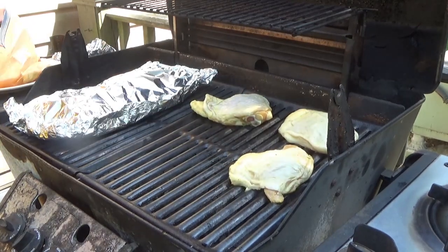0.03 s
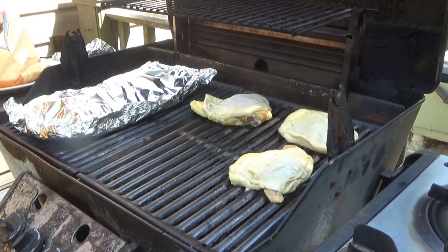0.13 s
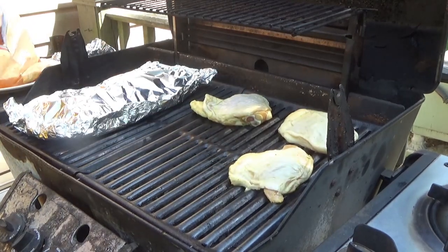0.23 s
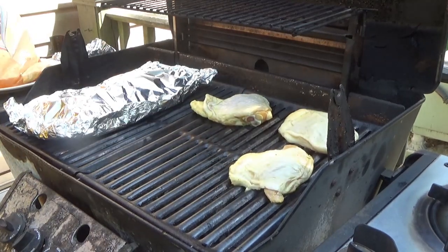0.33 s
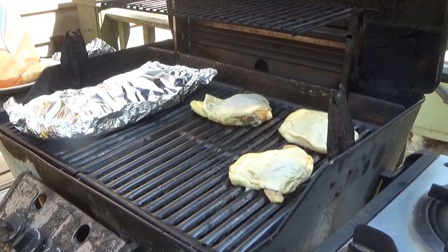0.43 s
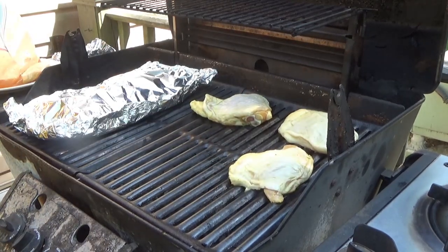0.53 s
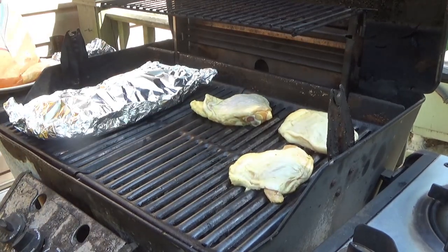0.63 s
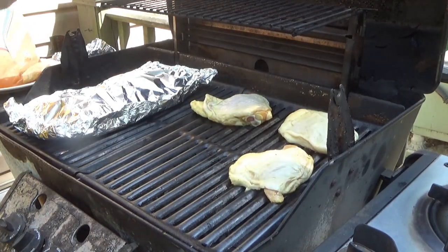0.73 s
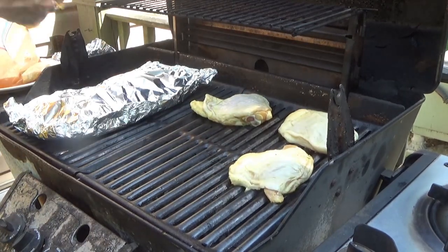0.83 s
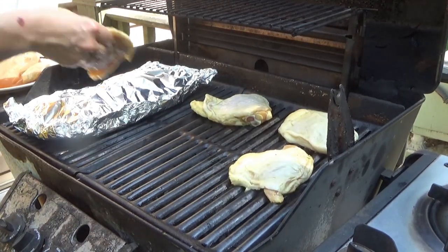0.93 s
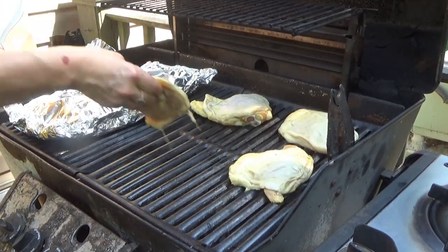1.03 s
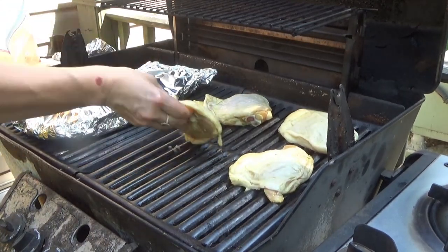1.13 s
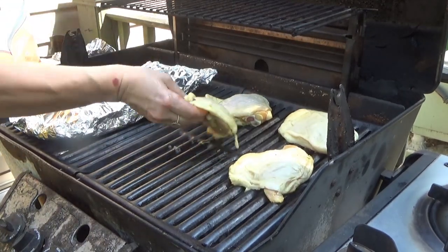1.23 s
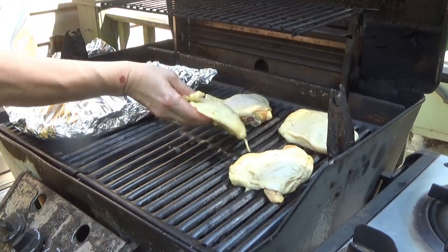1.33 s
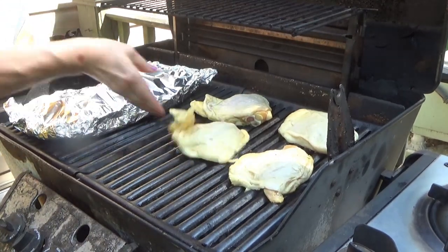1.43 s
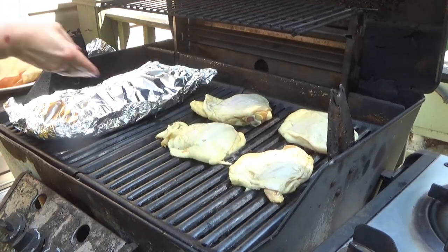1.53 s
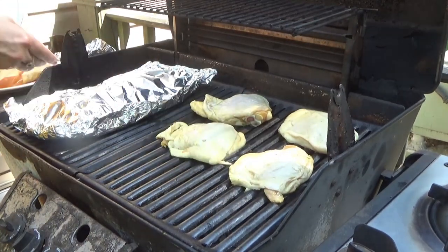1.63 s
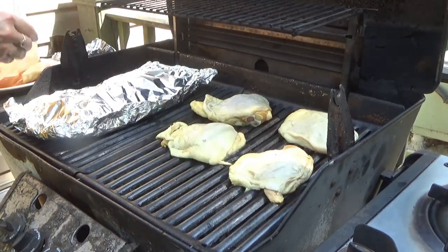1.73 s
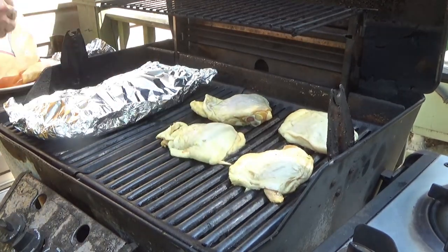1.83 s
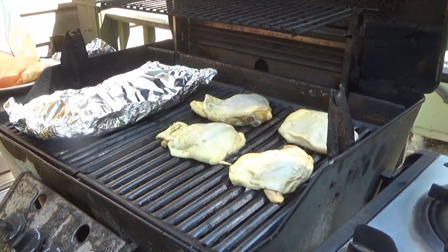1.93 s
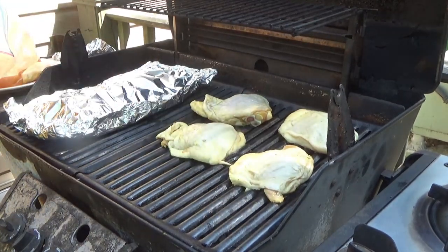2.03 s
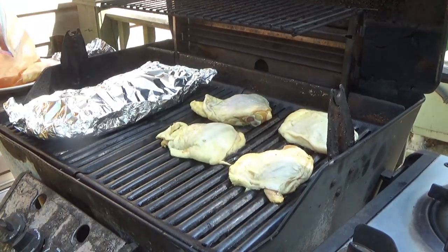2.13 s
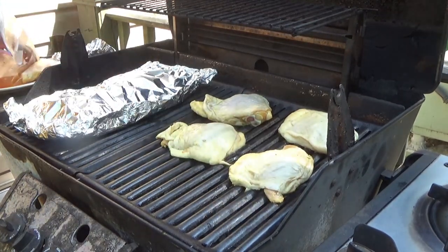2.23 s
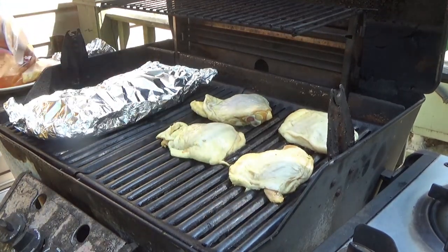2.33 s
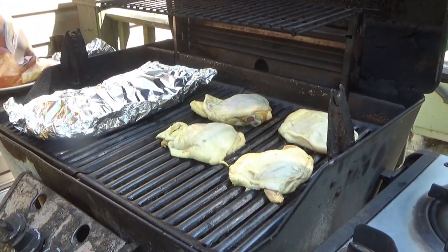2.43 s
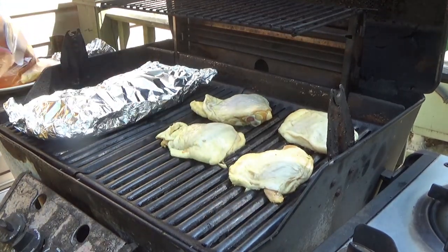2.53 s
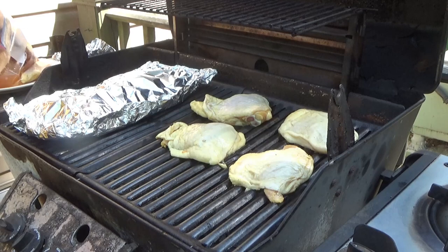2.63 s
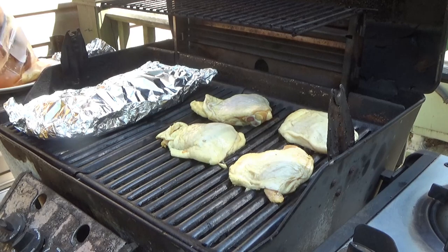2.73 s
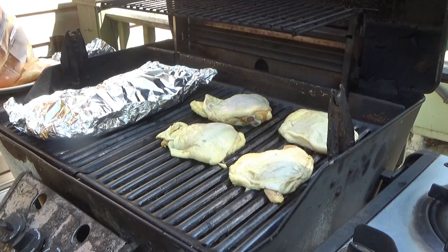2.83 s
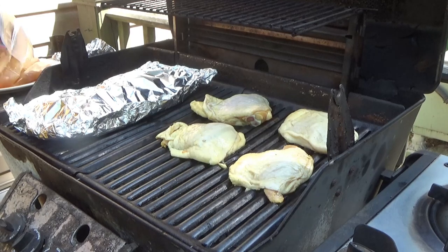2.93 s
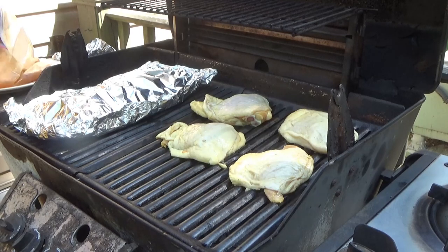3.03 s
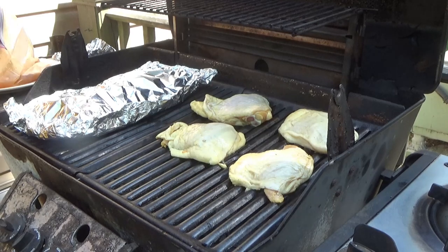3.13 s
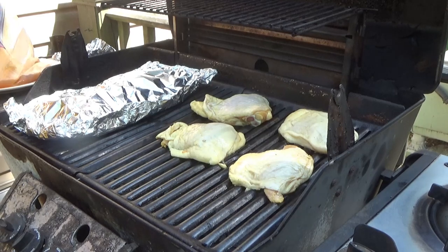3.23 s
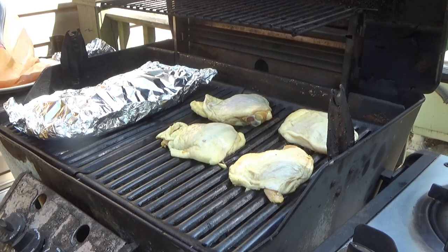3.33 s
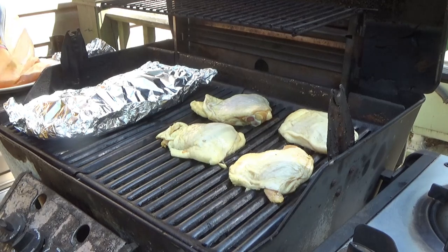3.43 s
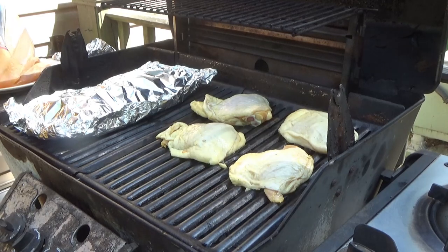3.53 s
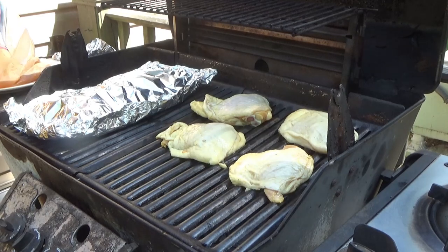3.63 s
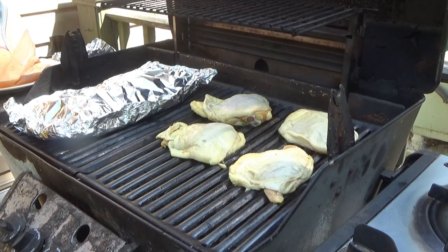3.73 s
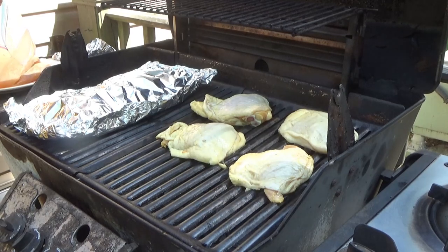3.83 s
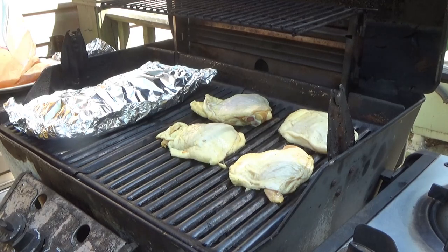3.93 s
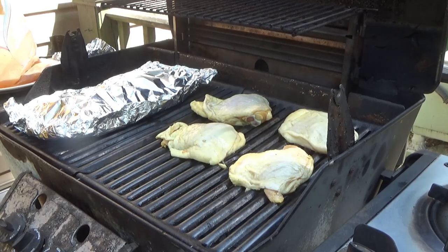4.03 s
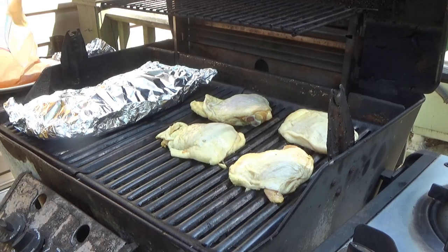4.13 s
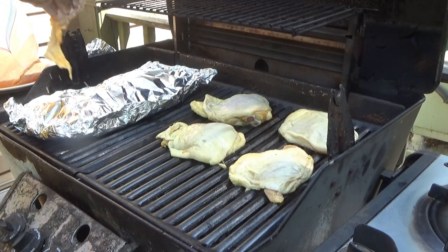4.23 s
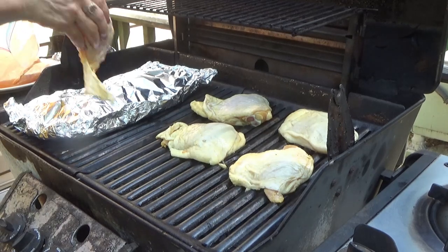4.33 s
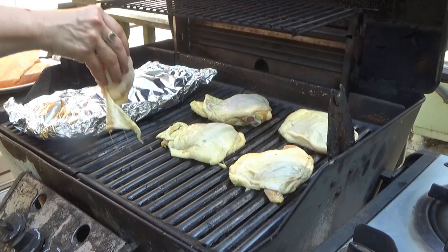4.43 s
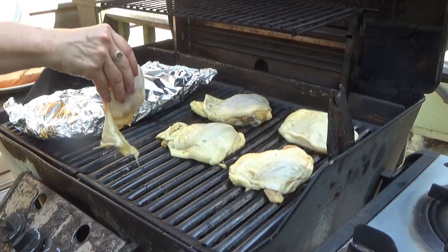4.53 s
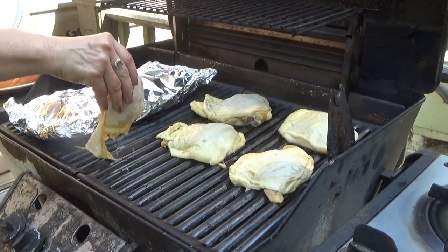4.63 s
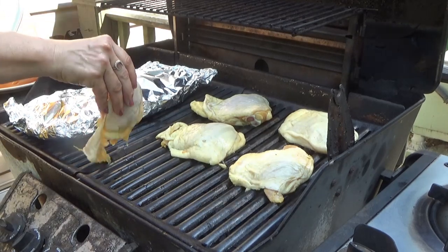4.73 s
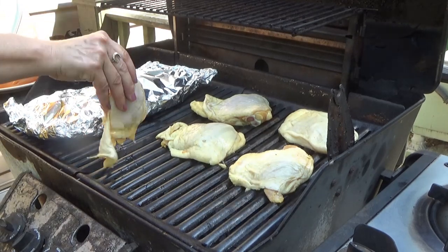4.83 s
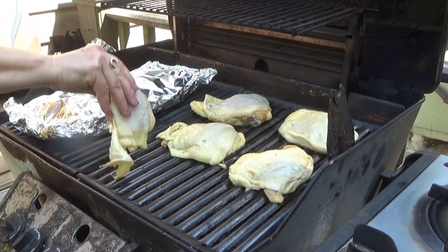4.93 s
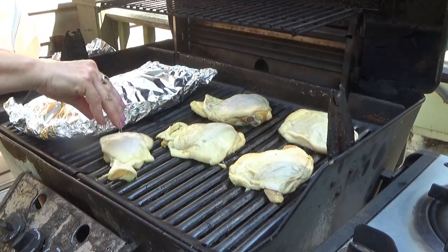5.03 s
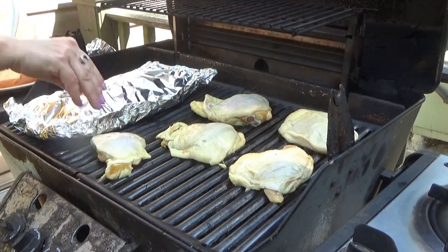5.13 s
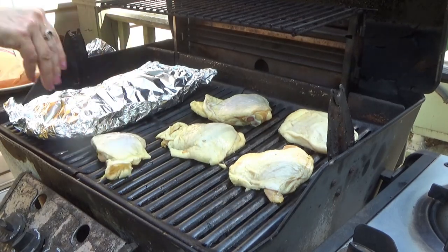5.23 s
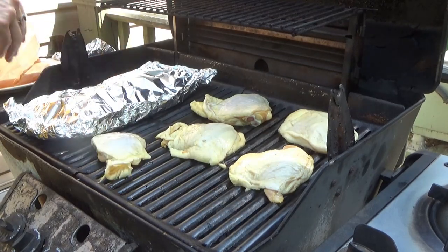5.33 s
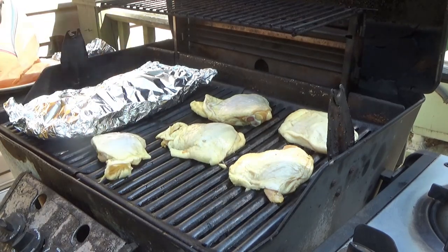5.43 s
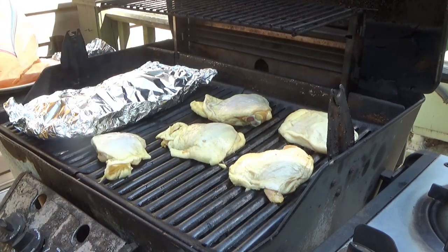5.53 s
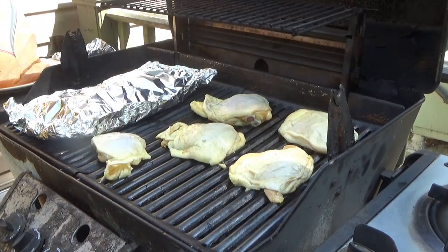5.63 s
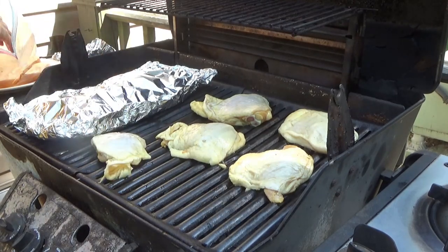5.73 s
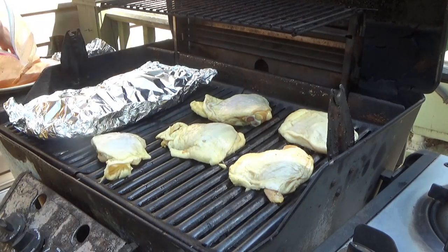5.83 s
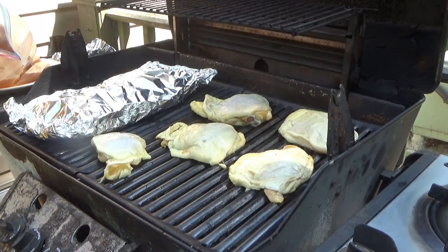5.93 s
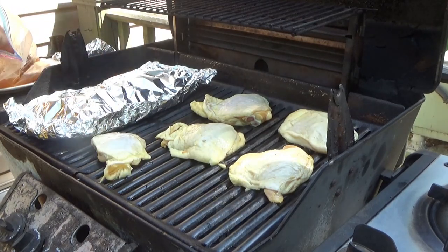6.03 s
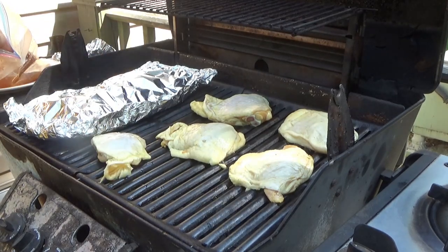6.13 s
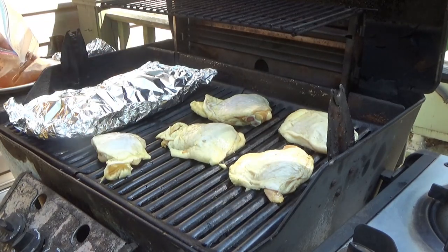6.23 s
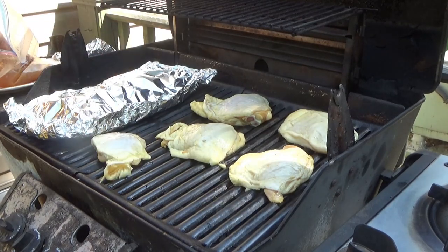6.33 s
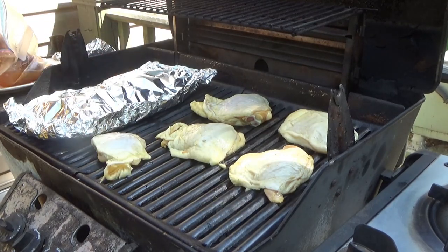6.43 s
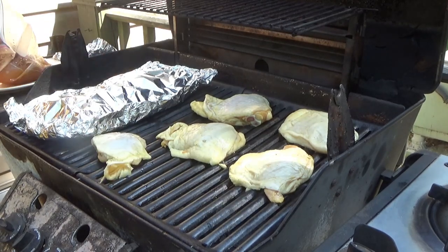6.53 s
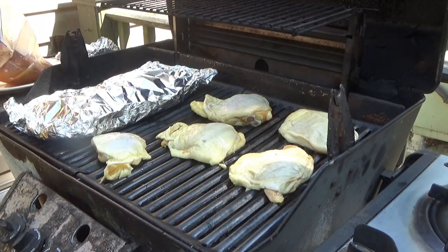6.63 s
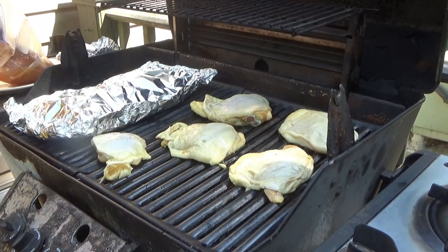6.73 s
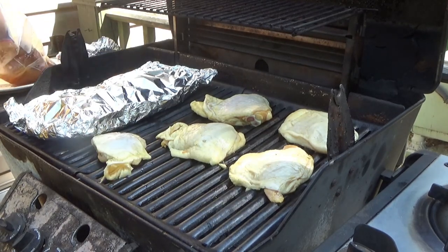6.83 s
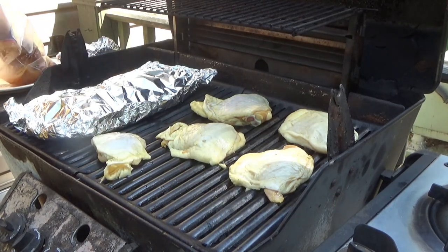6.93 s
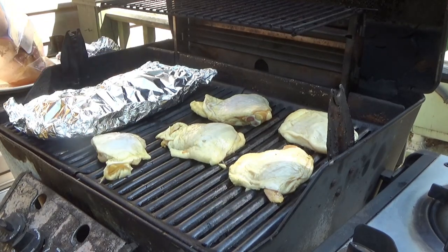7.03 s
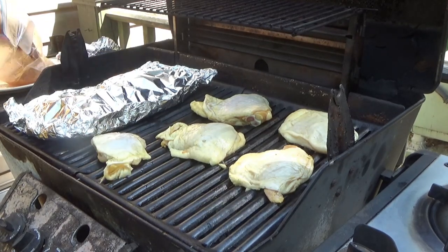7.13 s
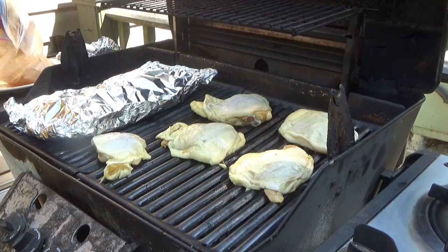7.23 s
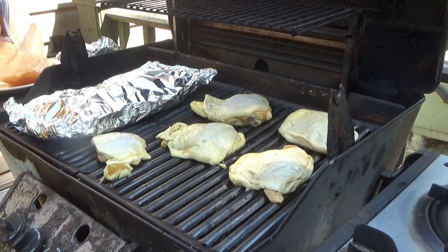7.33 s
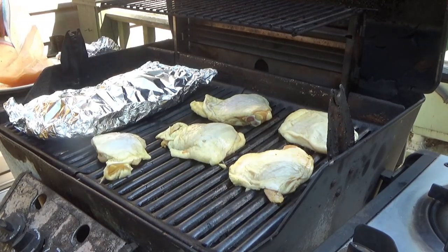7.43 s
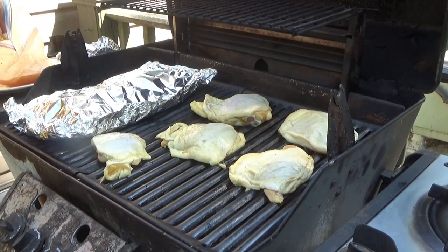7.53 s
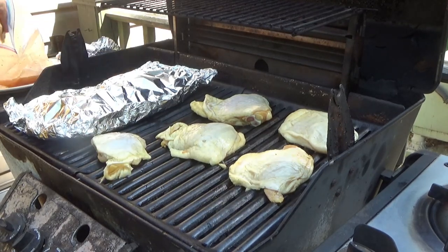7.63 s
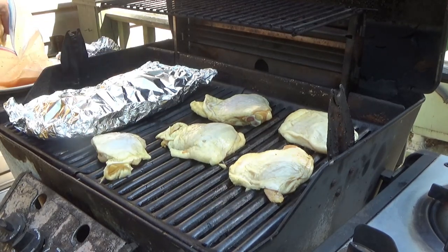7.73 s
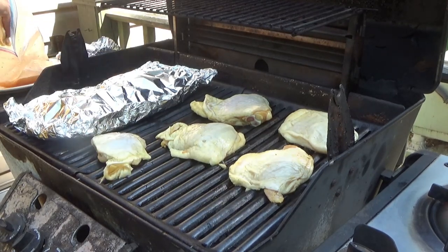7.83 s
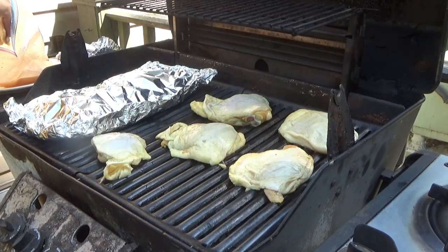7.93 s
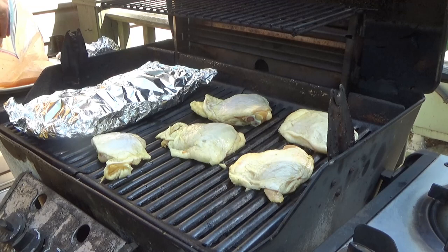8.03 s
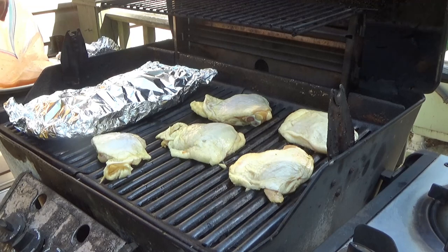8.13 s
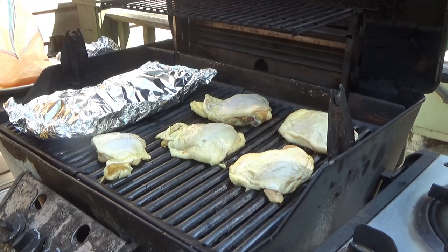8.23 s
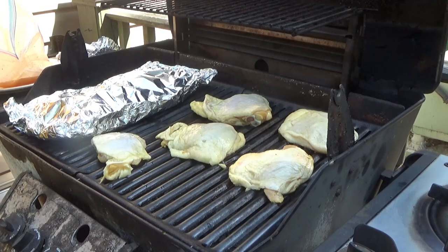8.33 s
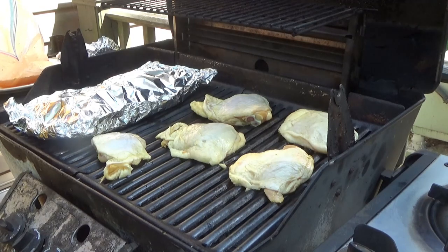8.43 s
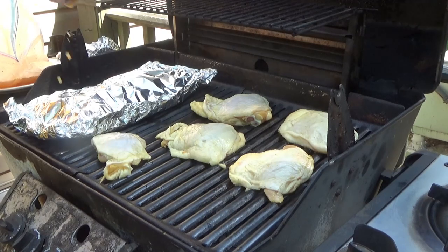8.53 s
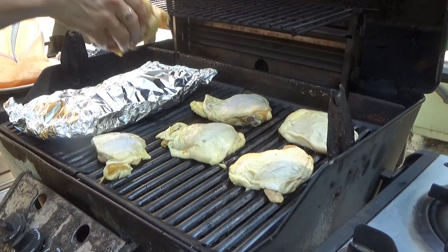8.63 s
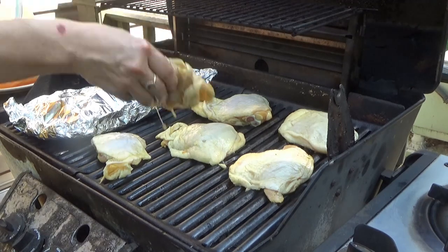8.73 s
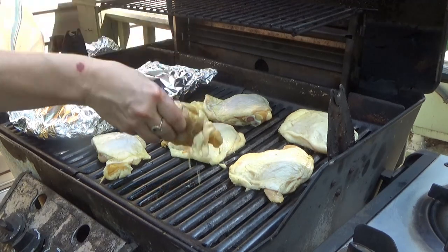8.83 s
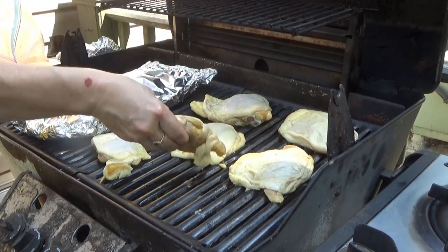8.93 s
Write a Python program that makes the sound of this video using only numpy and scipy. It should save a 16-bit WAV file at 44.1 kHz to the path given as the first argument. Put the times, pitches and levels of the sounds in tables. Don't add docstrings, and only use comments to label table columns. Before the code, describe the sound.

Close stereo sound at an outdoor gas grill: fine, bright sizzling with sharp spitting fat over a soft low burner roar. A piece of meat lands with a dull thud and a burst of steam, then a second with a crisper slap. Plastic crackles to the left, and wind rumbles against the microphone in the later part.

```python
import sys
import numpy as np
from scipy import signal
from scipy.fft import rfft, irfft, next_fast_len
from scipy.io import wavfile
from scipy.ndimage import uniform_filter1d

SR = 44100
rng = np.random.default_rng(int(sys.argv[2]) if len(sys.argv) > 2 else 0)


def put_to_file(sound):
    columns = np.atleast_2d(sound).T
    safe = np.clip(columns, -1, 1)
    whole_steps = np.round(safe * 32767)
    wavfile.write(sys.argv[1], SR, whole_steps.astype(np.int16))


def field_ratio(decibels):
    return 10 ** (np.asarray(decibels, dtype=float) / 20)


N = 395577
T = np.arange(0, N + 64, 32) / SR
SIZE = next_fast_len(N + SR // 2)
HZ = np.maximum(np.arange(SIZE // 2 + 1) * SR / SIZE, 1.)

# frequency_hz, density_db (per Hz)
BURNER_SPECTRUM = [(15, -43), (25, -12.5), (182, -2.5), (244, -3.5), (275, -3), (305, -6.5), (452, -6),
                   (626, -8), (706, -8.5), (1080, -8), (1500, -9.5), (1950, -26), (3300, -120)]
BURNER_DB = -52
# start_s, level_db (beside the calm roar), fade_s
FLARES = [
    (1.15, 3.5, .2),
    (1.55, 6, 0.46),
    (5.0, 4, .5),
    (5.68, 8.5, 0.85),
    (6.2, -1.5, 0.25),
    (6.65, 3, 0.14),
    (7.5, -18, .2),
]
FLARE_RISE_S = 0.066
# frequency_hz, side_minus_mid_db
YARD_SIDE = [(60, -32), (110, -30), (200, -20), (380, -13.5), (700, -10), (1290, -14.5), (2380, -19.5),
             (4400, -19), (8120, -20), (15000, -26.5)]

# frequency_hz, density_db (per Hz)
WIND_SPECTRUM = [(12, -37), (20, 2), (49, 3.5), (125, 0), (163, -3.5), (287, -13), (428, -24), (631, -29.5),
                 (700, -23.5), (910, -61), (1540, -120)]
# frequency_hz, side_minus_mid_db
WIND_SIDE = [(60, -17), (110, -10.5), (200, -8), (380, -4), (700, -3), (1290, -11), (2380, -21),
             (4400, -16), (8120, -18), (15000, -33)]
# start_s, length_s, rumble_db, tilt_db (from flutter towards slow heave)
GUSTS = [(4.56, .08, -65, 10), (4.76, 0.15, -61, 18), (5.552, 0.032, -36.5, 2), (5.675, 0.032, -43.5, 11),
         (5.793, 0.045, -38.5, 9), (5.875, 0.044, -43, 5), (6.08, 0.2, -32.5, -1),
         (6.29, 0.14, -33.5, -1.5), (6.503, 0.068, -33, 5), (6.61, 0.073, -29.5, -2),
         (6.717, 0.036, -39, 7), (6.785, .03, -47, 0), (6.87, .03, -48, 5), (7.001, 0.056, -29.5, -1),
         (7.064, 0.062, -29.5, -1), (7.2, 0.069, -29.5, 5), (7.284, 0.1, -33.5, 3),
         (7.406, 0.028, -21.5, -1), (7.48, 0.08, -28.5, 3), (7.614, 0.13, -27.5, -1),
         (7.735, 0.13, -31.5, 2.5), (7.917, 0.035, -30, 10), (8.002, .1, -36.5, 9), (8.18, .03, -45, 11),
         (8.307, .04, -44.5, 3), (8.383, 0.076, -37, 0), (8.417, 0.05, -28.5, 0), (8.677, 0.017, -33.5, 6),
         (8.746, 0.032, -43, 5), (8.85, 0.085, -35.5, 2)]
GUST_RISE_S, GUST_FADE_S, HEAVE_LATE_S = 0.021, 0.015, 0.018
HEAVE_DB, FLUTTER_DB = -8.5, -2.5
# time_s, level_db
BREEZE = [(4.1, -74), (5.3, -58), (5.7, -53), (7.5, -46), (8.2, -51), (8.97, -44)]

# start_s, peak_db, pitch_hz
CRINKLES = [(0.204, -35, 2620), (0.271, -28, 2590), (0.604, -49, 2540), (0.972, -25, 2530),
            (3.808, -34, 3480), (4.193, -20.5, 3150), (4.269, -32, 1397), (4.305, -31, 1160),
            (4.319, -24, 1930), (4.374, -28, 2610), (5.571, -26, 1250), (6.164, -31.5, 603),
            (6.197, -22.5, 2890), (6.222, -14.5, 2950), (6.239, -24, 1930), (6.4, -23, 2750),
            (6.501, -27, 1210), (6.54, -25.5, 3100), (6.561, -26, 1180), (6.58, -21, 2850),
            (6.679, -26, 1850), (6.698, -25, 1054), (6.78, -27.5, 1160), (6.859, -28.5, 2810),
            (7.119, -31, 2300), (7.147, -31, 2170), (7.627, -25.5, 2790), (8.629, -31, 1870)]
# start_s, peak_db, pitch_hz
TAPS = [
    (0.203, -31, 1150),
    (0.271, -37.5, 334),
    (0.603, -29.5, 1150),
    (0.972, -39, 476),
    (3.859, -37, 719),
    (4.319, -39, 670),
    (5.553, -33, 230),
    (5.556, -40, 520),
    (6.719, -34, 466),
    (6.749, -35, 458),
]
SNAP_T60_S = 0.075

# time_s, level_db
VENT = [(0, -58), (2.4, -41.5), (3.3, -56), (3.8, -41.5), (4.9, -43), (5.4, -41), (8, -47), (8.97, -63)]
VENT_HZ = 5150
# time_s, level_db
SQUEAL = [(5.2, -70), (5.34, -49), (5.5, -46), (5.62, -72)]
SQUEAL_HZ = 2820
# time_s, level_db
EDGE = [(1.6, -60), (2.1, -39), (2.6, -34), (3.2, -58)]
EDGE_HZ = 7900

# start_s, ring_db, centre_hz, thud_db, thud_fade_s
SLAPS = [(1.477, -40, 635, -33, 0.042), (1.5, -39, 400, -32.5, 0.041), (1.484, -45, 186, -51.5, 0.21),
         (5.071, -41, 3270, -19, 0.0067), (5.072, -41, 1700, -25.5, 0.015),
         (5.077, -30.5, 656, -20, 0.0067), (5.088, -52, 600, -27, 0.031), (5.162, -44, 255, -33, 0.013),
         (5.311, -47.5, 240, -59, 0.032), (5.552, -48, 700, -40.5, 0.013), (6.615, -58, 420, -42, 0.059),
         (6.665, -62, 480, -43, 0.054)]
# frequency_hz, level_db, t60_s
GRATE_MODES = [(133, -3, 1.25), (156.4, 6, 0.29), (233.4, 4.5, 0.49), (255, -5, 0.57), (286, -6, 0.62),
               (345, -13, 0.19), (451, -6, 0.51), (559, -2.5, 0.85), (600, 2, 0.31), (700, 2.5, 0.55),
               (737, -4.5, 0.31), (867, -4.5, 0.19), (1001, 0, 0.3), (1090, -1, 0.12), (1250, -2, 0.28),
               (1460, 5, 0.16), (1670, 7.5, 0.093)]
REACH_PER_OCTAVE, REACH_FROM_HZ = 0.39, 104
THUD_SPAN, THUD_PAN_DB = 0.68, 0.6
MEAT_DAMPING, DAMPED_FROM_HZ = 0.79, 320

# start_s, peak_db
SPITS = [(0.1327, -11), (0.5595, -12), (1.178, -13), (1.2587, -9.5), (2.0813, -22), (2.4727, -5),
         (3.5134, -13), (4.0204, -34), (4.1492, -12), (4.4633, -15), (4.5809, -13), (4.5894, -10),
         (4.7869, -13), (5.2834, -8), (5.6618, -22), (6.013, -11), (6.0978, -13), (6.2224, -22),
         (6.2423, -15), (6.2652, -7.5), (6.563, -16), (6.6307, -14), (6.7055, -19), (6.8107, -15),
         (6.9142, -19), (7.0717, -10), (7.2947, -13), (7.6226, -15), (7.6782, -14), (8.8444, -15)]
# frequency_hz, density_db (per Hz)
FIZZ_SPECTRUM = [(500, -26.5), (800, -18), (1300, -13.5), (2000, -11.5), (3000, -10), (3600, -9.5),
                 (3950, -6), (5200, -5), (6300, -4), (7600, -2.5), (10100, -2.5), (11200, -6),
                 (13000, -15.5), (15700, -25)]
BOIL_HZ = (2210, 5000, 8550, 13300)
# time_s, level_db
SIMMER = [(0, -29.5), (.5, -31), (1.02, -33.5), (1.42, -31), (1.8, -29), (2.2, -28.5), (2.6, -27.5),
          (3.15, -32), (4.0, -33), (4.5, -32.5), (5.0, -32), (5.5, -32), (6.2, -30.5), (7.0, -33),
          (7.85, -35), (8.15, -37), (8.5, -35), (8.97, -34.5)]
SIMMER_BASS = 0.24
# start_s, flash_db, flash_hold_s, flash_fade_s, juice_db
LAID = [
    (1.414, -29, .03, .05, -37),
    (1.47, -19, 0.099, 0.054, -37),
    (5.056, -29.5, .15, .15, -37),
    (8.919, -23, .1, .05, -39),
]
FLASH_RISE_S, JUICE_RISE_S, JUICE_FADE_S = 0.037, 0.046, 0.34
# start_s, level_db, length_s
SPURTS = [(0.013, -32, 0.036), (0.174, -30.5, 0.18), (0.522, -39, 0.097), (1.104, -31.5, 0.13),
          (1.92, -29, .12), (2.34, -27.5, 0.093), (2.75, -33, 0.14), (3.475, -33.5, 0.043),
          (4.106, -36, .06), (4.366, -35, 0.045), (4.57, -40, .05), (5.49, -31, 0.03), (6.12, -36, 0.05),
          (6.246, -46, .04), (6.6, -43, 0.051), (7.68, -43, 0.07), (8.6, -37, .06)]
SPURT_RISE_S, SPURT_FADE_S = 0.013, 0.013
FLASH_DB = (-5.5, -2.5, 1, 1.3)
JUICE_DB = (12.5, 6.5, -4, -3.5)
SPURT_DB = (-7, -5.5, -2.5, -1)
# time_s, width_db
WIDTH = [(0, -3), (4.2, -2), (5.4, 0), (6.4, -0.4), (8.97, -0.1)]
FLASH_NARROW_DB = -0.5
PAN_DB = 0.5
CEILING = 0.7


def level(x):
    return x / np.sqrt(np.mean(x ** 2))


def shape(points):
    hz, db = np.transpose(points)
    return field_ratio(np.interp(np.log(HZ), np.log(hz), db))


def colour(x, gain):
    return irfft(rfft(x, SIZE) * gain, SIZE)[..., :N]


def fine(control):
    return np.interp(np.arange(N) / SR, T, control)


def curve(points):
    return np.interp(T, *np.transpose(points))


def walk(rate):
    hold = int(1 / T[1] / rate)
    steps = np.repeat(rng.standard_normal(len(T) // hold + 1), hold)
    slewed = uniform_filter1d(uniform_filter1d(steps, hold), hold)
    return 1.1 * slewed[:len(T)]


def clicks(s, size):
    index = np.clip((np.asarray(s) * SR).astype(int), 0, N - 1)
    return np.bincount(index, size, N)


def swells(s, db, rise_s, hold_s, fade_s):
    s, db, rise_s, hold_s, fade_s = (np.reshape(v, (-1, 1)) for v in (s, db, rise_s, hold_s, fade_s))
    rise = np.clip((T - s) / rise_s, 0, 1) ** 2
    late = np.maximum(T - s - rise_s - hold_s, 0)
    return np.sum(field_ratio(db) ** 2 * rise * np.exp(-late / fade_s), axis=0)


def spread(mid, other, side_points):
    side = colour(other, shape(side_points))
    return np.array([mid + side, mid - side])


def bands(x, centres, gain_db):
    spectrum = rfft(x, SIZE)
    where = np.interp(np.log(HZ), np.log(centres), np.arange(len(centres)))
    out = 0
    for k, hz in enumerate(centres):
        window = np.clip(1 - abs(where - k), 0, 1)
        band = irfft(spectrum * window, SIZE)[..., :N]
        out = out + fine(field_ratio(gain_db(hz))) * band
    return out


def burner():
    gain = shape(BURNER_SPECTRUM) / (1 + (HZ / 1100) ** 4)
    mid, other = field_ratio(BURNER_DB - 0.35) * level(colour(rng.standard_normal((2, N)), gain))
    s, db, fade_s = np.transpose(FLARES)
    flare_db = 10 * np.log10(1 + swells(s, db, FLARE_RISE_S, 0, fade_s)) - 2.0

    def band_db(hz):
        return min(hz / 300, 1) * flare_db + 1.0 * walk(6) - 2.4 * (hz < 60)
    return bands(spread(mid, field_ratio(1.5) * other, YARD_SIDE), 40 * 3. ** np.arange(4), band_db)


def wind():
    s, length_s, db, tilt_db = np.transpose(GUSTS)
    shared = walk(30)
    lumps = [fine(field_ratio(2.25 * shared + 0.61 * walk(45))) for _ in range(2)]
    eddies = rng.standard_normal((2, N)) * lumps
    mid, other = level(colour(eddies, shape(WIND_SPECTRUM) / (1 + (HZ / 650) ** 4)))
    parts = {35: (HEAVE_LATE_S, HEAVE_DB + tilt_db), 110: (0, 0), 350: (0, FLUTTER_DB - tilt_db)}

    def band_db(hz):
        late, extra_db = parts[hz]
        gusts = swells(s + late - GUST_RISE_S, db + extra_db, GUST_RISE_S, length_s, GUST_FADE_S)
        return 10 * np.log10(field_ratio(curve(BREEZE)) ** 2 + gusts)
    return bands(spread(mid, field_ratio(3.5) * other, WIND_SIDE), list(parts), band_db)


def crinkles():
    out, t = np.zeros(N), np.arange(4096) / SR
    for s, db, hz in CRINKLES + TAPS:
        t60 = np.clip(SNAP_T60_S * (2000 / hz) ** 0.6, 0.005, 0.2)
        crack = 1.52 * np.exp(-t / 0.00035)
        snap = rng.standard_normal(len(t)) * (crack + np.exp(-np.log(1000) * t / t60))
        sos = signal.butter(1, (hz / 1.48, hz * 1.68), "band", fs=SR, output="sos")
        snap = signal.sosfilt(sos, snap)
        start = int(s * SR)
        out[start:start + len(t)] += field_ratio(db + 1.5) * snap / np.abs(snap).max()
    return out


def vent(points, centre_hz, width_hz):
    breath = level(colour(rng.standard_normal(N), 1 / (1 + (HZ / width_hz) ** 2)))
    pitch_hz = fine(centre_hz * (1 + 0.011 * walk(6)))
    phase = 2 * np.pi * np.cumsum(pitch_hz) / SR
    return np.sqrt(2) * breath * np.sin(phase) * fine(field_ratio(curve(points) + 0.51 * walk(11)))


def slaps():
    out, t = np.zeros((2, N)), np.arange(SR // 2) / SR
    hz, mode_db, t60 = np.repeat(np.transpose(GRATE_MODES), 2, axis=1)[:, :, None]
    damping = np.where(hz > DAMPED_FROM_HZ, MEAT_DAMPING, 1)
    decay = np.exp(-np.log(1000) * t / (t60 * damping))
    onset = 1 - np.exp(-t / 0.0011)
    thud_pan = THUD_PAN_DB * np.array([[1], [-1]])
    for s, ring_db, centre_hz, thud_db, fade_s in SLAPS:
        reach = REACH_PER_OCTAVE * np.log2(centre_hz / REACH_FROM_HZ)
        detune, phase = rng.random((2, len(hz), 1))
        place = field_ratio(0.97 * rng.standard_normal((2, len(hz))))
        share = np.exp(-0.5 * (np.log2(hz / centre_hz) / reach) ** 2)
        tones = np.sin(2 * np.pi * (hz * (1 + 0.032 * (detune - 0.5)) * t + phase))
        rings = place @ (share * field_ratio(mode_db) * decay * tones)
        edges = centre_hz * 2. ** (THUD_SPAN * np.array([-reach, reach]))
        sos = signal.butter(2, edges, "band", fs=SR, output="sos")
        thud = level(signal.sosfilt(sos, rng.standard_normal(len(t))))
        fade = np.exp(-t / fade_s) + 0.38 * np.exp(-t / (4 * fade_s))
        blow = field_ratio(ring_db) * rings + field_ratio(thud_db + thud_pan) * thud * fade
        start = int(s * SR)
        out[:, start:start + len(t)] += blow * onset
    return out


def firebox(t60=0.069, wet_db=-8):
    t = np.arange(2048) / SR
    tail = rng.standard_normal(len(t)) * np.exp(-np.log(1000) * t / t60) * (t > 0.0008)
    return rfft(np.append(1, field_ratio(wet_db) * tail[1:] / np.linalg.norm(tail)), SIZE)


def spits():
    s, db = np.transpose(SPITS)
    burst = shape(FIZZ_SPECTRUM) / (1 + (4000 / HZ) ** 2)
    place = field_ratio(0.59 * rng.standard_normal(len(s)) * np.array([[1], [-1]]))
    pulses = np.array([clicks(s, field_ratio(db + 4.0) * gain) for gain in place])
    return colour(pulses, burst * firebox()) / np.max(irfft(burst, SIZE))


def boiling():
    s, flash_db, hold_s, fade_s, juice_db = np.transpose(LAID)
    at, spurt_db, length_s = np.transpose(SPURTS)
    flash = swells(s, flash_db, FLASH_RISE_S, hold_s, fade_s)
    juice = swells(s, juice_db, JUICE_RISE_S, 0, JUICE_FADE_S)
    spurt = swells(at, spurt_db, SPURT_RISE_S, length_s, SPURT_FADE_S)
    return curve(SIMMER), flash, juice, spurt


def sizzle():
    when, sign, size, place = rng.random((4, 40000))
    size = np.sign(sign - 0.5) * field_ratio(np.minimum(-3.1 * np.log(1 - size), 13))
    when_s = when * N / SR
    hiss = rng.standard_normal((2, N))
    bursts = colour(level(clicks(when_s, size)), 1 / (1 + (3000 / HZ) ** 2))
    mid = bursts + field_ratio(2.5) * hiss[0]
    other = level(clicks(when_s, size * (place - 0.5))) + field_ratio(1.5) * hiss[1]
    simmer, *rushes = boiling()
    flash_over_db = 10 * np.log10(1 + rushes[0] / field_ratio(simmer) ** 2)
    width_db = fine(curve(WIDTH) + FLASH_NARROW_DB * flash_over_db)
    other = other * field_ratio(width_db + 2.0 + 1.8 * fine(walk(15)))
    mid, other = level(colour(np.array([mid, other]), shape(FIZZ_SPECTRUM)))
    both = spread(mid, other, YARD_SIDE) * field_ratio(np.array([[PAN_DB], [-PAN_DB]]) / 2)
    surge = walk(11)

    def band_db(hz):
        follow = np.interp(np.log(hz), np.log(BOIL_HZ[::2]), (SIMMER_BASS, 1))
        power = field_ratio(simmer.mean() + follow * (simmer - simmer.mean())) ** 2
        for rush, tone_db in zip(rushes, (FLASH_DB, JUICE_DB, SPURT_DB)):
            power = power + rush * field_ratio(np.interp(np.log(hz), np.log(BOIL_HZ), tone_db)) ** 2
        waver = 0.5 * surge + 0.5 * walk(1.41) + 1.6 * walk(5) + 0.56 * walk(25)
        return 10 * np.log10(power) + 1.45 + waver
    return bands(both, 900 * 2 ** np.arange(0, 4.3, 1 / 3), band_db)


def scene():
    bag = crinkles() * field_ratio(np.array([[1.6], [-1.6]]))
    whistles = vent(VENT, VENT_HZ, 320) + vent(SQUEAL, SQUEAL_HZ, 70) + vent(EDGE, EDGE_HZ, 600)
    return burner() + wind() + bag + whistles + slaps() + spits() + sizzle()


def top_cut(x):
    return signal.sosfilt(signal.butter(12, 15800, fs=SR, output="sos"), x)


def record(dry):
    mix = CEILING * np.tanh(dry / CEILING)
    return top_cut(mix)


dry = scene()
out = record(dry)
put_to_file(out)
```